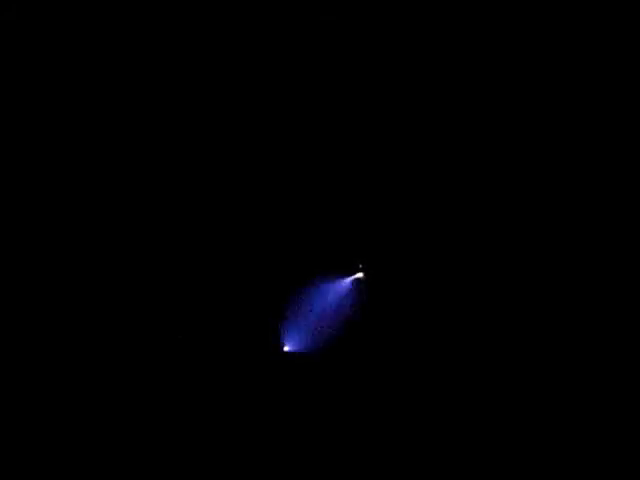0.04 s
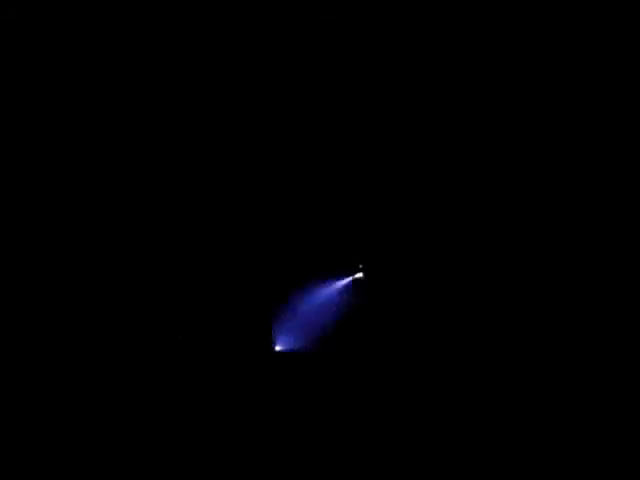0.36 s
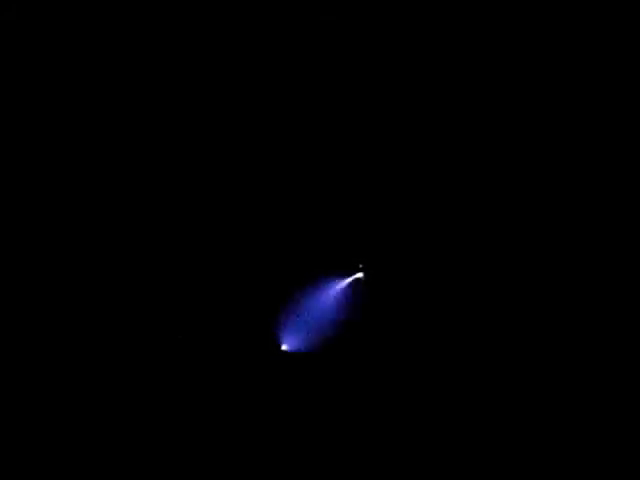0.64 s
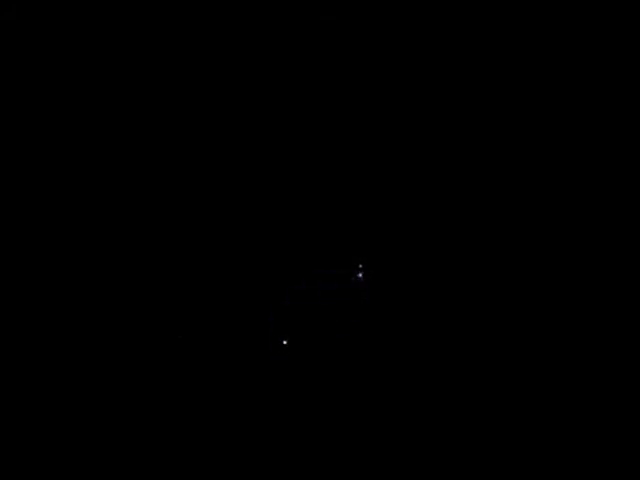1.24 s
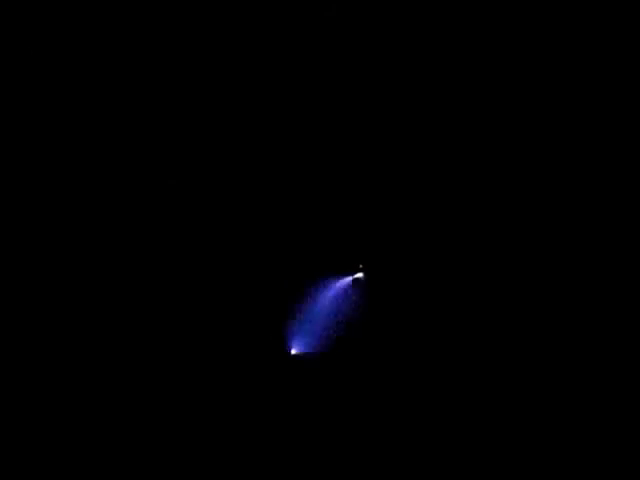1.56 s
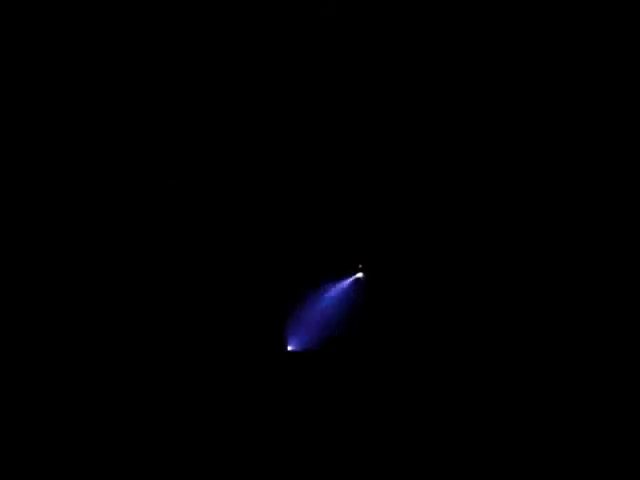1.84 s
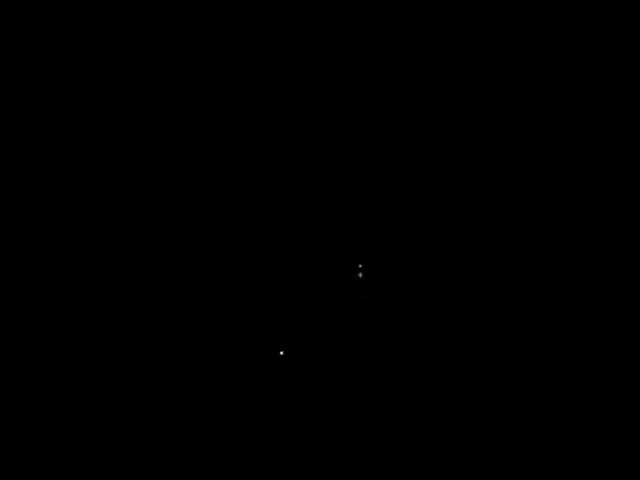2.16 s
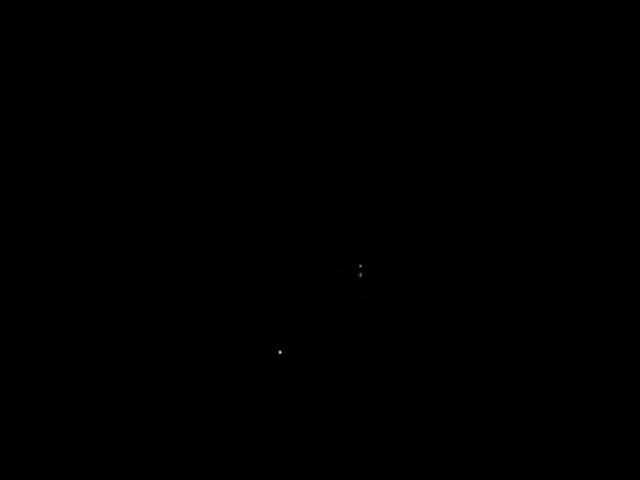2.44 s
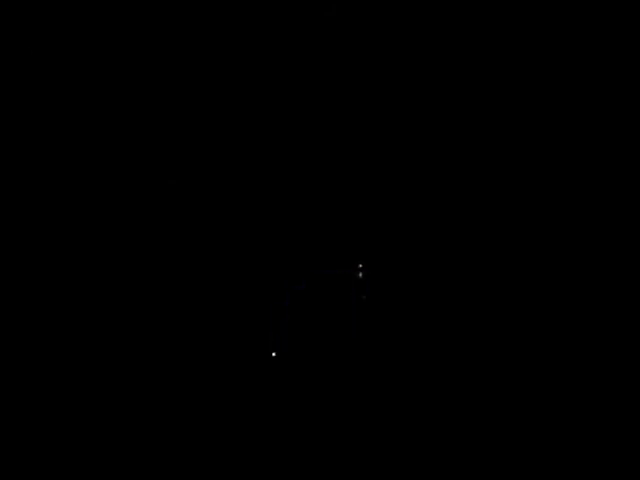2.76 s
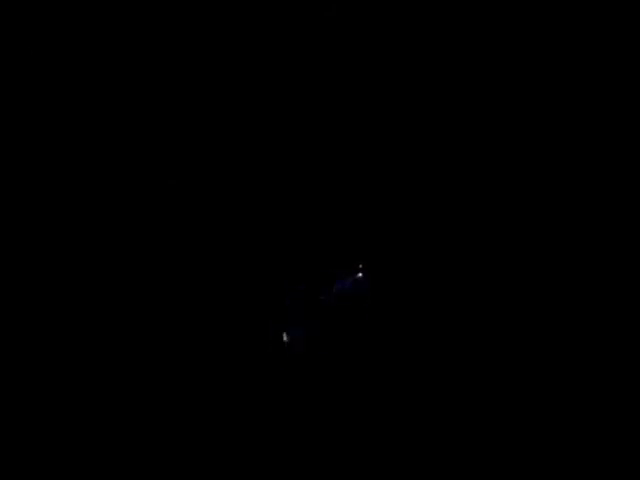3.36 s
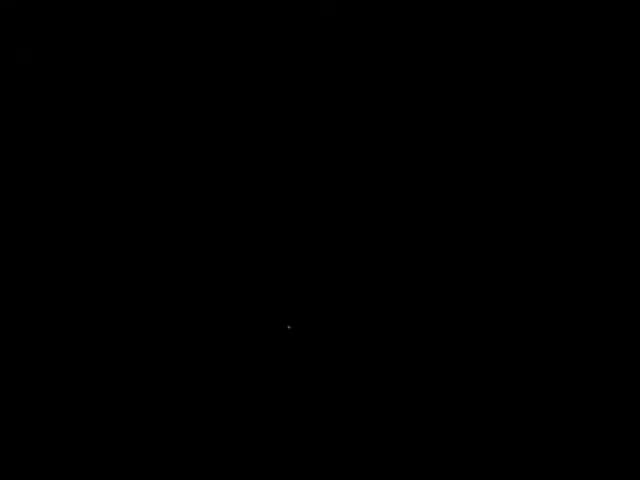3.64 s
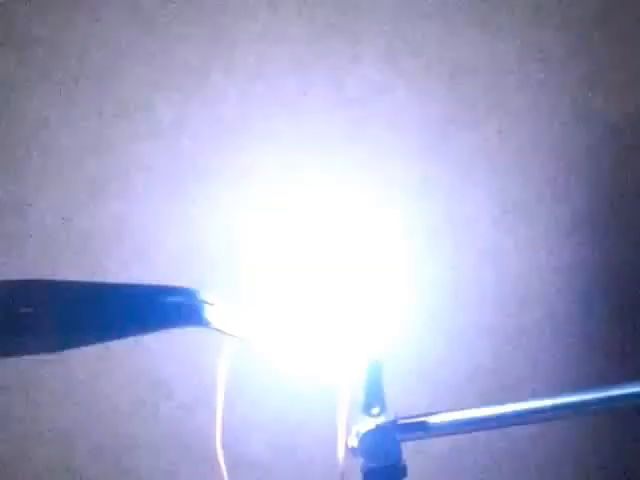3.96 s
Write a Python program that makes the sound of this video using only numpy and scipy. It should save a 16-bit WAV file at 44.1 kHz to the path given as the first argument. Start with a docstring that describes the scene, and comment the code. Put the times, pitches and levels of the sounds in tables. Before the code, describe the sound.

Six sharp electric sparks crack in quick succession after a faint high coil whine.

```python
"""Coil whine, corona and sparks

A high-voltage coil whines faintly in a small quiet room, its tip fizzing with corona.
Each surge of corona pushes the whine up, and it sinks back; then six sparks jump the gap.
Their shock waves overload a close microphone whose gain has been slowly creeping up."""
import sys
import numpy as np
from scipy import signal
from scipy.fft import rfft, irfft
from scipy.io import wavfile
from scipy.ndimage import uniform_filter1d

SR = 44100
rng = np.random.default_rng(int(sys.argv[2]) if len(sys.argv) > 2 else 0)


def store_wav(level_fs):
    """Save 16-bit WAV to argv[1]."""
    pcm = np.round(np.clip(np.atleast_2d(level_fs), -1, 1) * 32767)
    wavfile.write(sys.argv[1], SR, pcm.T.astype(np.int16))


N = 176400

# spectrum of the background hiss (frequency [Hz], relative density [dB])
HISS_SPECTRUM = [(20, 6), (60, -7), (110, -4), (170, -9.5), (260, -5.5), (340, -11), (700, -14),
                 (1400, -18.5), (2300, -14.5), (3000, -18.5), (4400, -10.5), (5600, -18), (7400, -15),
                 (7850, -21.5), (8170, -9.5), (8600, -18), (9000, -12), (9600, -19), (10250, -11),
                 (12000, -20.5), (15200, -18.5), (15600, -18)]
# tones of mains and fan hum (frequency [Hz], level [dB])
HUM_TONES = [(149.5, -68.5), (200, -70.5), (249, -67.5), (264, -66), (446, -75), (789, -77.5)]
# surges of corona (time of peak [s], peak frequency of the whine's octave [Hz])
CORONA_SURGES = [(0.045, 12880), (0.106, 12820), (0.184, 12970), (0.265, 12950), (0.351, 12880),
                 (0.47, 12640), (0.607, 12720), (0.669, 12900), (0.777, 12860), (0.817, 12790),
                 (0.909, 12740), (1.033, 12680), (1.116, 12810), (1.225, 12860), (1.302, 12880),
                 (1.424, 12900), (1.5, 12730), (1.565, 12850), (1.67, 12860), (1.756, 12860),
                 (1.863, 12890), (1.973, 12820), (2.088, 12760), (2.352, 12820), (2.543, 12810),
                 (2.927, 12710), (3.198, 12860), (3.299, 12750), (3.349, 12940), (3.457, 12920),
                 (3.515, 13560)]
# spectrum of the corona fizz (frequency [Hz], relative density [dB])
FIZZ_SPECTRUM = [(300, -12), (1400, -16), (2200, -5), (2950, -12.5), (3600, 0.5), (3900, -11.5),
                 (4320, 4.5), (4800, -6), (5100, -18.5), (5600, -5.5), (7700, -13.5), (8200, -5),
                 (9600, -11), (10300, -8), (15500, -7.5)]
# spits of corona (time [s], lift of the fizz [dB])
CORONA_SPITS = [(0.469, 13), (.588, 4), (.6085, 5), (0.657, 8), (0.904, 12), (.994, 20.5), (1.1153, 12),
                (1.765, 8), (1.868, 8), (2.091, 11.5), (2.344, 16), (2.926, 18.5), (3.198, 11)]
# breakdowns of the gap (time [s], strength [dB], lag of the second shock [s])
GAP_SPARKS = [(3.5802, 12, .0004), (3.6642, 5.5, .00074), (3.7431, 5, .00076), (3.8198, 5, 0.001),
              (3.891, 4.5, .00101), (3.9699, 5, 0.0011)]
# spectrum of a spark's snap (frequency [Hz], relative density [dB])
SNAP_SPECTRUM = [(100, -30), (500, -18.5), (850, -6), (1400, -9), (1700, 1.5), (2600, -6.5), (3400, 4.5),
                 (5300, -3), (7000, -5.5), (7800, -7), (8600, -2), (10000, -8), (12000, -3.5), (15500, -4)]
# reflections off near surfaces (delay [s], level relative to the snap [dB])
REFLECTIONS = [(.00275, -3.5), (.0034, -11), (.0056, -20), (0.0123, -22), (.0154, -29)]
# modes of the apparatus (frequency [Hz], relative level [dB], 60 dB decay time [s])
APPARATUS_MODES = [(3250, -30, 0.041), (3656, -11.5, 0.0093), (4205, -9, 0.015), (4855, -19, 0.024),
                   (5220, -17.5, 0.024), (5306, -22.5, 0.045), (6000, -28, 0.031), (6730, -20, 0.013),
                   (8640, -41, 0.046), (11910, -41, 0.027), (12770, -23, 0.04)]
# reverberation of the room (frequency [Hz], relative level [dB], 60 dB decay time [s])
ROOM_BANDS = [(60, -6, 0.083), (200, -1, 0.075), (500, -8.5, 0.051), (1530, -12.5, 0.17), (3000, -4, 0.17),
              (5070, 0, 0.16), (8950, 2, 0.12), (15500, 0, 0.096)]

OCTAVE_REST_HZ, FULL_SURGE_HZ, CLIMB_S, SAG_S = 12380, 425, 0.022, 0.105
FUNDAMENTAL_DB, FUNDAMENTAL_LOAD_DB, OCTAVE_DB, OCTAVE_LOAD_DB = -67, 10.5, -48.5, -7
DISCHARGES_PER_S, FIZZ_DB, FIZZ_LOAD_DB, FIZZ_CLIMB_DB = 3500, -63, 8.5, 4
SPIT_RISE_S, SPIT_DECAY_S, BUILD_UP_S, BUILD_UP_DB = 0.0018, 0.008, 3.19, 1.5
SNAP_DB, SNAP_S, SECOND_SHOCK_DB, PUSH_DB, PUSH_S = 6, 0.00015, -0.5, -1.5, 0.0011
SCATTER_DB, SCATTER_S, ROOM_DB, ROOM_RISE_S = 12, 0.0022, 4.5, 0.00081
START_DUCK_DB, RECOVER_DB_PER_S, GAIN_LAG_S = 13, 3.5, 0.095
THRESHOLD_DB, DETECTOR_S, BAND_LIMIT_HZ = -15, 0.02, 15750


def amp(db):
    """Amplitude grows tenfold for every 20 dB."""
    return 10 ** (np.asarray(db) / 20)


def unit(x):
    """Normalisation to an rms of 1."""
    return x / np.sqrt(np.mean(x ** 2) + 1e-20)


def interpolate(points, hz):
    """Linear interpolation on a log-frequency axis."""
    f, value = np.transpose(points)
    return np.interp(np.log(hz + 1), np.log(f + 1), value)


def add(mix, start_s, sound):
    """Superposition: a delayed sound adds to the mix."""
    part = mix[max(round(start_s * SR), 0):][:len(sound)]
    part += sound[:len(part)]


def colour(x, spectrum):
    """A minimum-phase filter of unit energy imposes a spectrum causally."""
    log_gain = np.log(amp(interpolate(spectrum, abs(np.fft.fftfreq(2048, 1 / SR)))))
    taps = np.fft.ifft(np.exp(np.conj(signal.hilbert(log_gain)))).real
    return signal.fftconvolve(x, taps / np.linalg.norm(taps))[:len(x)]


def drift(rate_hz):
    """Low-passed noise wanders at random, with an rms of 1."""
    lowpass = np.exp(-(np.fft.rfftfreq(N, 1 / SR) / rate_hz) ** 2)
    return unit(irfft(rfft(rng.standard_normal(N)) * lowpass, N))


def background():
    """Random modulation makes the hiss waver, the rumble swell and the hum wander in pitch."""
    hiss_gain = amp(interpolate(HISS_SPECTRUM, np.fft.rfftfreq(N, 1 / SR)))
    hiss = unit(irfft(rfft(rng.standard_normal(N)) * hiss_gain, N))
    hum = np.zeros(N)
    for hz, db in HUM_TONES:
        phase = 2 * np.pi * np.cumsum(hz + 2.41 * drift(rate_hz=8.2)) / SR
        hum += amp(db) * unit(np.sin(phase))
    rumble = drift(rate_hz=71) * amp(-70.5 + 2.5 * drift(rate_hz=3))
    return hiss * amp(-52.5 + 0.5 * drift(rate_hz=15)) + hum + rumble


def octave_frequency():
    """Relaxation: each surge ramps the whine's octave to a peak, from which it sags exponentially."""
    t, hz = np.arange(N) / SR, np.full(N, float(OCTAVE_REST_HZ))
    for peak_s, peak_hz in CORONA_SURGES:
        climb = np.clip((t - peak_s) / CLIMB_S + 1, 0, 1)
        excess_hz = (peak_hz - OCTAVE_REST_HZ) * np.exp(-np.maximum(t - peak_s, 0) / SAG_S)
        hz += climb * (OCTAVE_REST_HZ + excess_hz - hz)
    return hz


def whine(octave_hz, load):
    """Forced vibration: the core sounds its switching rate and the octave; load shifts their balance."""
    phase = np.pi * np.cumsum(octave_hz) / SR
    fundamental = amp(FUNDAMENTAL_DB + FUNDAMENTAL_LOAD_DB * load + 1.2 * drift(38)) * np.sin(phase)
    octave = amp(OCTAVE_DB + OCTAVE_LOAD_DB * load + 1.2 * drift(56)) * np.sin(2 * phase)
    return np.sqrt(2) * (fundamental + octave)


def corona(load):
    """Shot noise: tiny discharges merge into a fizz that follows the load, spits and builds up."""
    t = np.arange(N) / SR
    discharges = (rng.random(N) < DISCHARGES_PER_S / SR) * rng.standard_normal(N)
    discharges *= amp(2 * np.minimum(rng.exponential(1, N), 4))  # a few stand out
    spits_db = sum(db * np.exp(-np.maximum((t - s) / SPIT_DECAY_S, (s - t) / SPIT_RISE_S))
                   for s, db in CORONA_SPITS)
    climbing = uniform_filter1d(1.0 * (np.gradient(load) > 0), size=400)
    level_db = FIZZ_DB + FIZZ_LOAD_DB * load + FIZZ_CLIMB_DB * climbing + spits_db
    level_db += BUILD_UP_DB * (t > BUILD_UP_S)
    return unit(colour(discharges, FIZZ_SPECTRUM)) * amp(level_db + 3 * drift(rate_hz=43))


def burst(t, decay_s):
    """Exponentially damped noise of unit energy."""
    x = rng.standard_normal(len(t)) * np.exp(-t / decay_s)
    return x / np.linalg.norm(x)


def sparks():
    """Breakdown sends two shocks, each a snap and a low push; the first excites echoes and ringing."""
    out, t = np.zeros(N), np.arange(SR // 10) / SR
    first, second = (amp(SNAP_DB) * burst(t, SNAP_S) for _ in range(2))
    echoes = amp(SCATTER_DB) * burst(t, SCATTER_S)
    for delay, db in REFLECTIONS:
        add(echoes, delay, amp(SNAP_DB + db) * burst(t, SNAP_S))
    ring = sum(amp(db - 60 * t / t60) * np.sin(2 * np.pi * hz * t) for hz, db, t60 in APPARATUS_MODES)
    crack = colour(first + echoes, SNAP_SPECTRUM) + ring
    second_snap = colour(second, SNAP_SPECTRUM)
    pulse = np.sin(np.pi * np.minimum(t / PUSH_S, 1)) ** 2
    push = amp(PUSH_DB) * signal.lfilter(*signal.butter(2, 49, "high", fs=SR), pulse)
    for start_s, db, lag_s in GAP_SPARKS:
        add(out, start_s, amp(db) * crack + push)
        add(out, start_s, amp(db + ROOM_DB) * reverberation())
        add(out, start_s + lag_s, amp(SECOND_SHOCK_DB) * (amp(db) * second_snap + push))
    return out


def reverberation():
    """A diffuse field builds up quickly, then each band decays exponentially at its own rate."""
    hz, t, noise = signal.stft(rng.standard_normal(SR // 3), SR, nperseg=256)
    bands = np.array(ROOM_BANDS)
    level_db = interpolate(bands[:, [0, 1]], hz)[:, None]
    t60 = interpolate(bands[:, [0, 2]], hz)[:, None]
    tail = signal.istft(noise * amp(level_db - 60 * t / t60), SR, nperseg=256)[1]
    tail *= 1 - np.exp(-(np.arange(len(tail)) / SR / ROOM_RISE_S) ** 2)
    return tail / np.linalg.norm(tail)


def scene():
    """Pressures add at one microphone; whine and corona stop at the first spark."""
    cracks = sparks()
    octave_hz = octave_frequency()
    load = np.clip((octave_hz - OCTAVE_REST_HZ) / FULL_SURGE_HZ, 0, 1.2)
    before_breakdown = np.arange(N) / SR < GAP_SPARKS[0][0]
    coil = (whine(octave_hz, load) + corona(load)) * before_breakdown
    return (cracks + coil + background())[None]


def smooth(x, time_constant_s):
    """A first-order lag follows its input with exponential memory."""
    pole = np.exp(-1 / (time_constant_s * SR))
    return signal.lfilter([1 - pole], [1, -pole], x)


def record(dry):
    """Automatic gain creeps up and ducks after loud sound; peaks saturate, then the band is limited."""
    x = dry[0]
    power_db = 10 * np.log10(smooth(np.tanh(x) ** 2, DETECTOR_S) + 1e-12)
    over_db = np.maximum(power_db - THRESHOLD_DB, 0)
    recovery_db = np.arange(N) / SR * RECOVER_DB_PER_S
    target_db = np.maximum(np.maximum.accumulate(over_db + recovery_db), START_DUCK_DB) - recovery_db
    duck_db = START_DUCK_DB + smooth(target_db - START_DUCK_DB, GAIN_LAG_S)
    saturated = np.tanh(x * amp(-duck_db))
    lowpass = signal.firwin(1201, BAND_LIMIT_HZ, window=("kaiser", 8), fs=SR)
    return signal.oaconvolve(saturated, lowpass, "same")[None]


dry = scene()
out = record(dry)
store_wav(out)
```